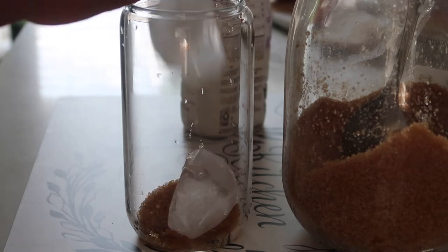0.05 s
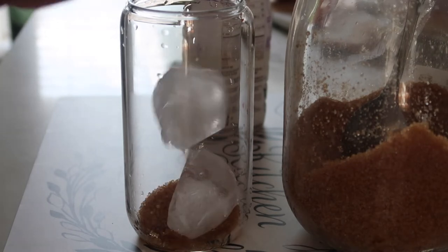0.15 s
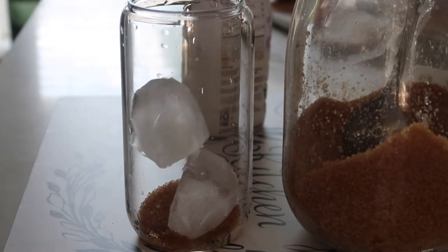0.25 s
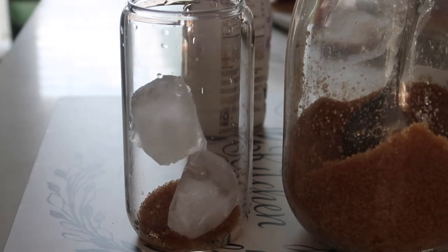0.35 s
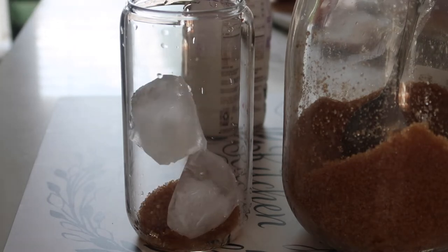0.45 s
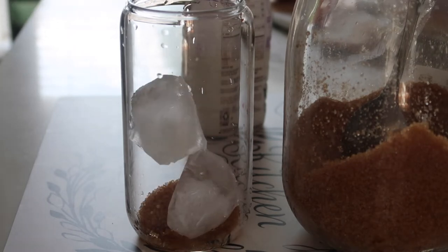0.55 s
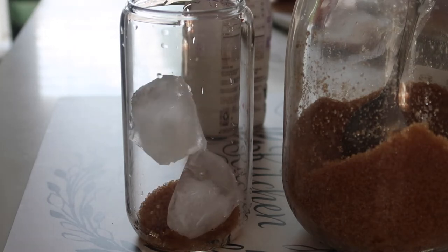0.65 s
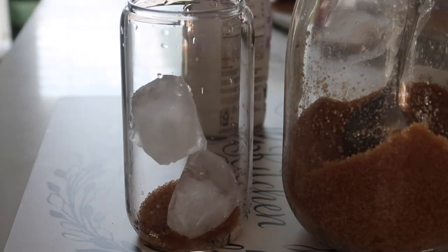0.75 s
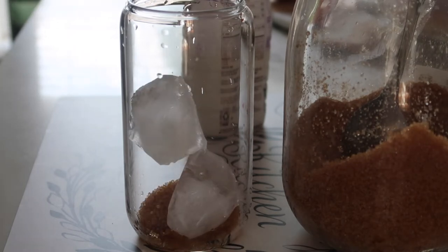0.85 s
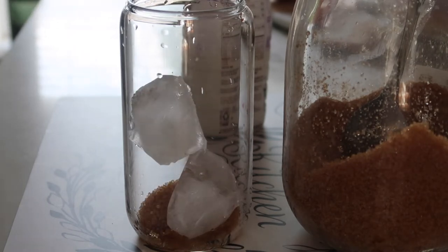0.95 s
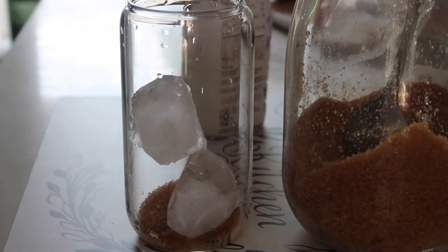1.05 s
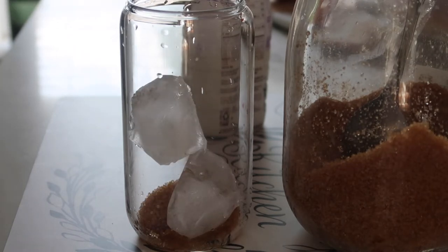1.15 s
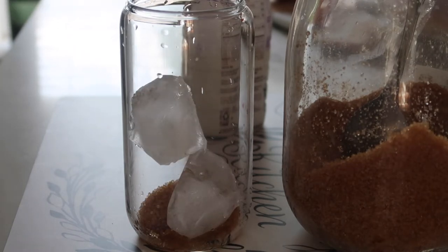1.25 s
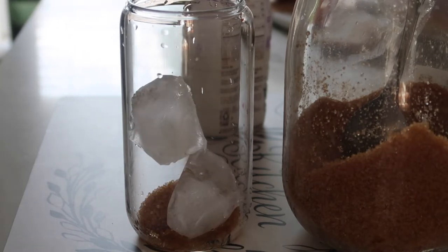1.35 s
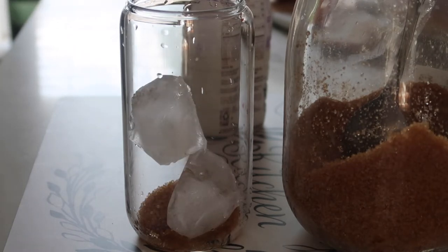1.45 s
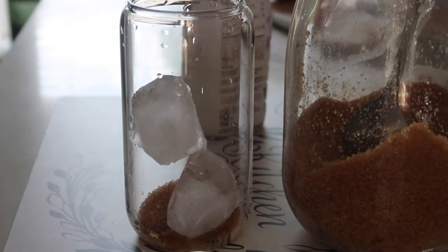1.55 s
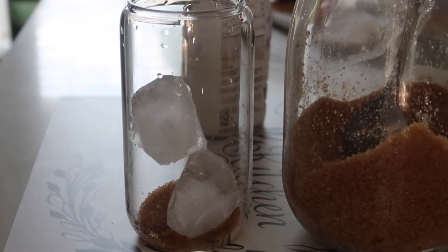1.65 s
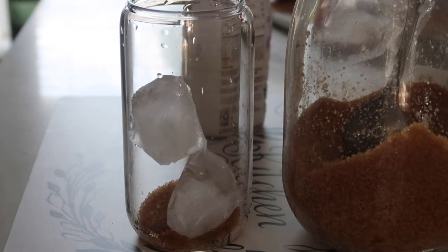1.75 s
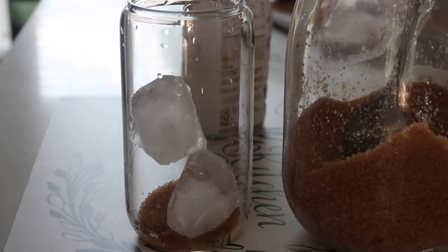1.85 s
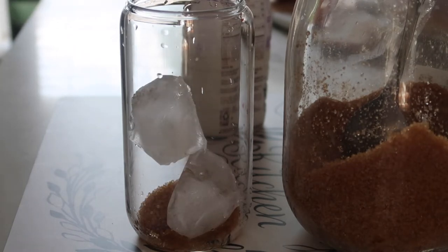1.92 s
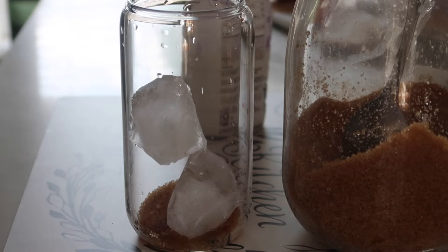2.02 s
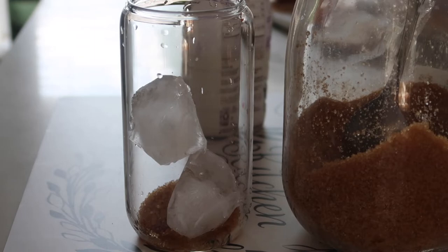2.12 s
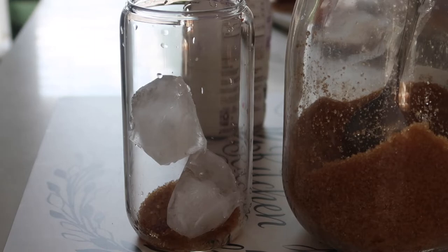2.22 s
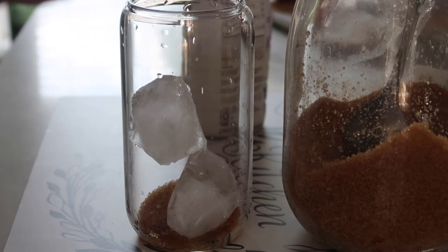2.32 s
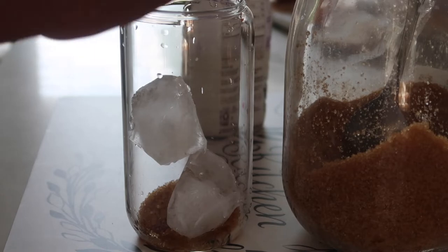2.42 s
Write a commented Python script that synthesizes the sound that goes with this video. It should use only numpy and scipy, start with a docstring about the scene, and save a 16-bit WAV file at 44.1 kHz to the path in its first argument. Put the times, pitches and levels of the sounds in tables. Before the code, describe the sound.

Close, sharp clink of ice falling into a glass, with a short chattering glassy ring that is quickly damped, then softer hollow rattling of distant ice cubes in a small kitchen with faint airy appliance hum.

```python
"""Kitchen: an ice cube drops into a glass tumbler close by, knocks on the cube below and rings the glass.
Further off, more cubes clatter in a hollow container; a kitchen appliance hums under it all.
Contacts are noise bursts and damped modes, the glass a set of beating modes, the hum filtered noise and tones.
The loud clink makes the recorder turn itself down for a moment."""
import sys
import numpy as np
from scipy import signal
from scipy.fft import irfft
from scipy.io import wavfile
from scipy.ndimage import uniform_filter1d

SR = 44100
rng = np.random.default_rng(int(sys.argv[2]) if len(sys.argv) > 2 else 0)


def pcm_store(signal):
    """Save signal as 16-bit PCM."""
    levels = np.round(np.clip(np.atleast_2d(signal), -1, 1) * 32767)
    wavfile.write(sys.argv[1], SR, levels.astype(np.int16).T)


N = 110250
TIME = np.arange(N) / SR
CONTACT_S = 0.0002  # time for a contact to build up


def amp(db):
    """Decibels to gain."""
    return 10 ** (np.asarray(db) / 20)


def unit(x):
    """Scales to rms 1."""
    return x / np.sqrt(np.mean(x ** 2) + 1e-20)


def read(points, hz):
    """Interpolates a table along a log-frequency axis."""
    table_hz, value = np.transpose(points)
    return np.interp(np.log(hz + 1), np.log(table_hz), value)


def add(mix, start_s, sound):
    """Adds a sound to the mix at start_s, cut at the end of the mix."""
    part = mix[:, round(start_s * SR):][:, :sound.shape[-1]]
    part += sound[..., :part.shape[1]]


def drift(size):
    """Smooth complex noise of rms 1 that changes over about size samples."""
    white = rng.standard_normal((2, N))
    a, b = uniform_filter1d(uniform_filter1d(white, size=size), size=size)
    return (unit(a) + 1j * unit(b)) / np.sqrt(2)


# stereo width: (frequency [Hz], side minus mid [dB])
WIDTH_DB = [(60, -58), (150, -26.5), (400, -20), (1000, -18.5), (2000, -15), (3500, -6.5), (5000, -2.5),
            (8000, 3), (12000, 21)]


def noise(colour, size):
    """Two-channel noise of a given colour, near mono in the bass and wide in the treble; rms 1."""
    hz = np.fft.rfftfreq(size, 1 / SR)
    mid, side = np.exp(2j * np.pi * rng.random((2, len(hz))))
    width = amp(read(WIDTH_DB, hz))
    left_right = np.array([mid + width * side, mid - width * side])
    return unit(irfft(left_right * amp(read(colour, hz)) / np.hypot(1, width), size))


def onset(t, rise_s=CONTACT_S):
    """Smooth start of a contact: sine-squared rise."""
    return np.sin(np.pi / 2 * np.clip(t / rise_s, 0, 1)) ** 2


def burst(colour, t60_s, size=4096):
    """One contact: coloured noise under a fast exponential decay."""
    t = TIME[:size]
    fade = onset(t) * amp(-60 * t / t60_s)
    return unit(noise(colour, size) * fade) * np.sqrt(np.mean(fade ** 2))


def struck(modes, rise_s, size, pitch=1):
    """One contact sets off damped modes at random phases."""
    t = TIME[:size]
    hz, db, t60_s = np.transpose(modes)
    turns = np.outer(t, hz * pitch) + rng.random(len(hz))
    decay = amp(db - 60 * t[:, None] / t60_s)
    return onset(t, rise_s) * (decay * np.sin(2 * np.pi * turns)).sum(1)


# room decay: (frequency [Hz], t60 [s])
ROOM_T60_S = [(100, 0.11), (600, 0.46), (1800, 0.55), (4600, 0.51), (9000, 0.49), (15000, 0.13)]
ROOM_RISE_S = 0.0063
ROOM_GRAIN_DB = 4.5  # single reflections stand out of the tail


def room(x, size=32768):
    """Grainy kitchen tail excited by the left channel, each band dying at its own speed."""
    grain_db = ROOM_GRAIN_DB * np.clip(drift(size=50).real[:size], -2, 2)
    reflections = noise([(1, 0), (SR, 0)], size) * amp(grain_db)
    hz, t, bands = signal.stft(reflections, SR, nperseg=256)
    decay = amp(-60 * t / read(ROOM_T60_S, hz)[:, None])
    tail = signal.istft(bands * decay, SR, nperseg=256)[1]
    tail = tail * np.minimum(np.arange(tail.shape[1]) / SR / ROOM_RISE_S, 1) ** 2
    return signal.fftconvolve(x[:1], tail / np.linalg.norm(tail[0]), axes=1)[:, :N]


# air colour: (frequency [Hz], level per Hz [dB])
AIR_COLOUR = [(15, -47), (30, -19), (55, -12), (119, -4), (140, -11), (173, -8), (293, -10), (382, -7.5),
              (525, -8), (802, -10), (1700, -11), (3200, -18.5), (6330, -30.5), (8800, -35.5),
              (10500, -39.5), (14000, -46)]
# hum lines: (frequency [Hz], level [dB])
HUM_LINES = [(58.6, -48.5), (93.5, -51.5), (117, -49.5), (173.5, -47.5), (234, -52), (355, -53),
             (757, -55.5)]
AIR_DB, AIR_PATCH_DB = -34.5, 1.4
HUM_WAVER = 0.23  # rms share of each line


def appliance():
    """Kitchen appliance: steady rush of air with faint drifting patches, plus wavering hum lines."""
    bands = signal.stft(noise(AIR_COLOUR, N), nperseg=1024, noverlap=768)[2]
    patches = uniform_filter1d(rng.standard_normal(bands.shape[1:]), size=10, axis=0)
    patches = unit(uniform_filter1d(patches, size=14, axis=1))
    air = signal.istft(bands * amp(AIR_PATCH_DB * patches), nperseg=1024, noverlap=768)[1][:, :N]
    hum = 0
    for hz, db in HUM_LINES:
        tone = np.exp(2j * np.pi * (hz * TIME + rng.random()))
        hum = hum + amp(db) * (1 + HUM_WAVER * drift(size=5000)) * tone
    return amp(AIR_DB) * unit(air) + np.sqrt(2) * hum.real


# cube in the tumbler: (time [s], knock level [dB], base level [dB], crack level [dB], ring level [dB],
# ring brightness an octave or more above the lowest mode [dB])
CUBE_DROPS = [(.2078, -9, -12, -18, -27, -20), (.2135, -31, -37, -24, -17.5, -5),
              (.2510, -16.5, -30, -23, -10, -25), (.2588, -10.5, -27, -4.5, 2.5, 1),
              (.2760, -32, -33, -47, -11.5, -1), (.2950, -23, -18.5, -52, -4.5, 6.5),
              (.3430, -34, -29.5, -55, -17, -11), (.3720, -44, -48, -56, -18.5, -23),
              (.4040, -53, -25, -61, -37, 18), (.4690, -30, -27, -50, -45.5, 23),
              (.4910, -50, -37, -60, -19.5, -37), (.6050, -55, -50, -67, -32.5, -1)]
# contact colours: (frequency [Hz], level per Hz [dB])
KNOCK_COLOUR = [(40, -30), (90, -9), (170, -2), (400, 1.5), (620, -4), (900, -1), (1600, -2.5), (2300, 3),
                (2850, 2.5), (3400, -22), (6000, -37), (15000, -71)]
CRACK_COLOUR = [(200, -27), (1500, -15), (2700, -12), (4600, 9), (5700, -11), (10000, -10.5), (13000, -30),
                (16000, -46)]
# tumbler base on the table: (frequency [Hz], level [dB], t60 [s])
BASE_MODES = [(164, -6.5, 0.029), (233, -9, 0.046), (384, -11, 0.089), (536, -5.5, 0.081),
              (602, -0.5, 0.087)]
# falling cube: (frequency [Hz], level [dB], t60 [s])
CUBE_MODES = [(2787, -3, 0.037), (1604, -1.5, 0.028)]
KNOCK_T60_S, CRACK_T60_S = 0.033, 0.023


def tumbler_contacts():
    """Falling cube knocks, cracks on the wall and chatters to rest; its modes and the base's respond."""
    contacts = np.zeros((2, N))
    for start_s, knock_db, base_db, crack_db, _, _ in CUBE_DROPS:
        knock = amp(knock_db) * burst(KNOCK_COLOUR, KNOCK_T60_S)
        crack = amp(crack_db) * burst(CRACK_COLOUR, CRACK_T60_S)
        base = amp(base_db) * struck(BASE_MODES, 2 * CONTACT_S, size=16000)
        cube = amp(knock_db) * struck(CUBE_MODES, CONTACT_S, size=16000)
        add(contacts, start_s, knock + crack)
        add(contacts, start_s, base + cube)
    return contacts


RING_HZ, OVERTONE_HZ, PARTNER_HZ = 2184, 4716, 5058  # three of the glass modes
# tumbler, some close pairs beat: (frequency [Hz], level [dB], t60 [s], left-ear phase lead [rad])
GLASS_MODES = [(RING_HZ, 0, 0.48, -0.14), (2230, -15, 0.75, 1.5), (OVERTONE_HZ, -11.5, 0.54, 1.83),
               (4640, -18, 0.88, 3.5), (PARTNER_HZ, -23, 0.65, 5.5), (5020, -14.5, 0.13, 0),
               (7380, -35.5, 0.4, 0.5), (8120, -32, 0.45, 4.5), (8160, -34, 0.24, 2), (8460, -38, .24, -1),
               (9740, -39, 0.33, 4.5), (10190, -31, .3, 3.5), (10720, -32, 0.18, -2.5),
               (12812, -38, .14, 4), (13700, -38, .1, 4.5), (14300, -44, .1, 0.5)]
# cube leans on the wall and damps the ring: (time [s], level change [dB])
WALL_TOUCHES = [(0.304, -12.5), (.400, -10), (.440, -8.5), (.530, -7.5)]
TOUCH_S, TOUCH_HIGH_SHARE = 0.0075, 0.63  # high modes lose less than the lowest
SOFT_RISE_S = 0.012  # longest rise: a gentle nudge swells the ring
FLUTTER_PER_KHZ, FLUTTER_MAX = 0.07, 0.7


def glass_ring():
    """Blows feed the glass modes, soft ones slowly; touches damp them, the lowest most; high ones flutter."""
    touch_db = sum(db * np.clip((TIME - start_s) / TOUCH_S, 0, 1) for start_s, db in WALL_TOUCHES)
    t, ring = TIME[:SR], 0
    for hz, db, t60_s, lead_rad in GLASS_MODES:
        decay, level = amp(db - 60 * t / t60_s), np.zeros((1, N))
        height_oct = np.clip(np.log2(hz / RING_HZ), 0, 1)
        damping_db = touch_db * (1 + (TOUCH_HIGH_SHARE - 1) * height_oct)
        for start_s, _, _, _, ring_db, bright_db in CUBE_DROPS:
            rise_s = min(2 * CONTACT_S / amp(ring_db) ** 2, SOFT_RISE_S)
            # earlier touches do not weaken a new blow
            earlier_db = np.interp(start_s, TIME, damping_db)
            blow = amp(ring_db + bright_db * height_oct - earlier_db)
            add(level, start_s, blow * onset(t, rise_s) * decay)
        depth = min(FLUTTER_PER_KHZ * hz / 1000, FLUTTER_MAX)
        flutter = (1 + depth * drift(size=600)) / np.hypot(1, depth)
        tone = flutter * np.exp(2j * np.pi * hz * TIME)
        ears = np.exp(1j * lead_rad * np.array([[0.5], [-0.5]]))
        ring = ring + amp(damping_db) * level * (tone * ears).real
    return ring


NEAR_ROOM_DB, RING_ROOM_DB = -5.5, -17


def tumbler():
    """Contacts and glass ring, each with its own share of room."""
    contacts, ring = tumbler_contacts(), glass_ring()
    return contacts + ring + amp(NEAR_ROOM_DB) * room(contacts) + amp(RING_ROOM_DB) * room(ring)


# cubes in the container: (time [s], thud level [dB], hollow ring level [dB], click level [dB],
# cube ping level [dB], ping pitch [Hz])
CUBE_CLATTER = [(.951, -39, -33, -31, -34, 1900), (0.969, -32, -38, -31, -26.5, 3240),
                (1.1375, -22.5, -14.5, -16, -10, 2370), (1.1452, -25, -8.5, -35, -28, 1980),
                (1.160, -22.5, -18, -25, -28, 3050), (1.1847, -25, -15, -26, -19, 3130),
                (1.1926, -17.5, -8, -25.5, -10.5, 2000), (1.2153, -20.5, -19, -14.5, -10.5, 2330),
                (1.2166, -21, -30, -30, -11, 3380), (1.2215, -15, -16, -27, -24, 1890),
                (1.226, -19, -16, -26, -24, 3150), (1.238, -25.5, -19, -44, -20, 2000),
                (1.2645, -45, -16.5, -43, -32, 1900), (1.358, -40, -26, -36, -36, 3210),
                (1.394, -35, -22.5, -15, -16.5, 3330), (1.414, -47, -25, -18.5, -16, 2140),
                (1.4426, -29.5, -39, -23.5, -29, 3300), (1.6419, -34, -38, -23.5, -20, 2230),
                (1.709, -53, -22.5, -22, -13.5, 2327), (1.766, -37, -28, -38, -26, 2270),
                (1.795, -51, -32, -33.5, -25.5, 2000), (1.936, -40, -46, -42, -28, 3100),
                (1.9499, -36, -38, -46, -17, 2034)]
# contact colours: (frequency [Hz], level per Hz [dB])
THUD_COLOUR = [(60, -52), (250, -17.5), (450, -3), (1000, -3), (1400, -3), (2500, -6.5), (6000, -48),
               (15000, -61)]
CLICK_COLOUR = [(200, -30), (1200, -9), (2700, -4.5), (3500, 1), (4600, 0.5), (6000, -7.5), (8000, -13),
                (10000, -14), (11500, -43), (15000, -55)]
# jostled cube: (ratio to its pitch [1], level [dB], t60 [s])
PING_MODES = [(1, 1.5, 0.014), (1.27, -10.5, 0.013)]
# hollow container: (frequency [Hz], level [dB], t60 [s])
BOX_MODES = [(1713, 2, 0.038), (1628, -2, 0.046), (1867, -2.5, 0.053)]
THUD_T60_S, CLICK_T60_S = 0.056, 0.024
BOX_RISE_S = 0.0025  # the hollow ring builds up slowly


def clatter():
    """Jostled cubes click, thud and ping at their own pitch; all sound the same hollow container."""
    contacts, ring = np.zeros((2, 2, N))
    for start_s, thud_db, ring_db, click_db, ping_db, ping_hz in CUBE_CLATTER:
        thud = amp(thud_db) * burst(THUD_COLOUR, THUD_T60_S)
        click = amp(click_db) * burst(CLICK_COLOUR, CLICK_T60_S)
        ping = amp(ping_db) * struck(PING_MODES, 2 * CONTACT_S, size=3000, pitch=ping_hz)
        add(contacts, start_s, thud + click)
        add(contacts, start_s, ping)
        add(ring, start_s, amp(ring_db) * struck(BOX_MODES, BOX_RISE_S, size=6000))
    return contacts, ring


# brittle snaps of the ice: (time [s], level [dB])
ICE_SNAPS = [(1.1371, -31), (1.6417, -29), (1.709, -41.5)]
# snap colour: (frequency [Hz], level per Hz [dB])
SNAP_COLOUR = [(2000, -35), (5000, 5), (5800, -10), (8000, -4.5), (11000, -0.5), (14000, -8), (16000, -26)]
SNAP_T60_S = 0.14


def ice_snaps():
    """Brittle snaps: bright noise bursts."""
    snaps = np.zeros((2, N))
    for start_s, db in ICE_SNAPS:
        add(snaps, start_s, amp(db) * burst(SNAP_COLOUR, SNAP_T60_S))
    return snaps


ECHO_S, ECHO_DB = 0.0115, -9.5
FAR_ROOM_DB, BOX_ROOM_DB = -2.5, -6


def container():
    """Clatter and snaps further off, thrown back by a nearby wall with ears swapped, plus room."""
    contacts, ring = clatter()
    contacts = contacts + ice_snaps()
    echo = np.zeros((2, N))
    add(echo, ECHO_S, amp(ECHO_DB) * (contacts + ring)[::-1])
    return contacts + ring + echo + amp(FAR_ROOM_DB) * room(contacts) + amp(BOX_ROOM_DB) * room(ring)


def scene():
    """Appliance, tumbler and container together."""
    return appliance() + tumbler() + container()


TRIP_DB = -6.5
DUCK_DB, DUCK_FALL_S, DUCK_CREEP_DB_PER_S, DUCK_HOLD_S, DUCK_RELEASE_S = 12.5, 0.011, 6.5, 0.673, 0.029
CEILING, EDGE_HZ = 1, 15400


def record(dry):
    """First loud peak trips the gain control, which ducks, creeps up and lets go; then overload and low-pass."""
    power = uniform_filter1d((dry ** 2).mean(0), size=440)
    tripped = np.maximum.accumulate(power > amp(TRIP_DB) ** 2)
    age_s = np.cumsum(tripped) / SR
    held = np.clip(1 - (age_s - DUCK_HOLD_S) / DUCK_RELEASE_S, 0, 1)
    fall = 1 - np.exp(-age_s / DUCK_FALL_S)
    duck_db = (DUCK_DB - DUCK_CREEP_DB_PER_S * age_s) * fall * held
    ducked = dry * amp(-duck_db)
    limited = ducked / (1 + (ducked / CEILING) ** 8) ** (1 / 8)
    low_pass = signal.firwin(255, EDGE_HZ, window=("kaiser", 9), fs=SR)
    return signal.oaconvolve(limited, low_pass[None], "same")


dry = scene()
out = record(dry)
pcm_store(out)
```